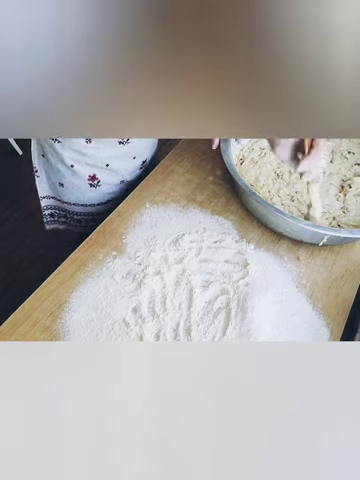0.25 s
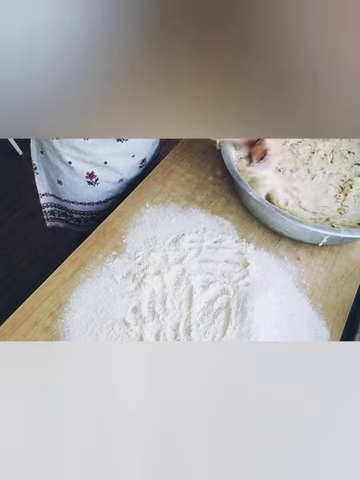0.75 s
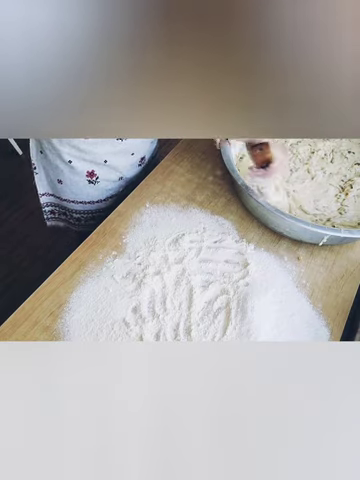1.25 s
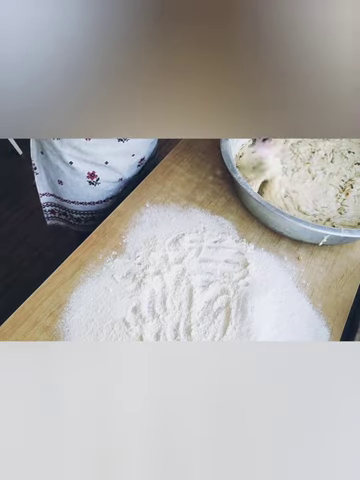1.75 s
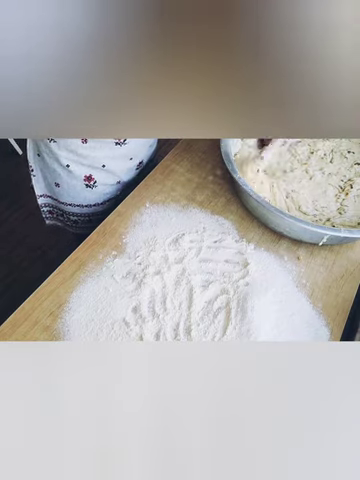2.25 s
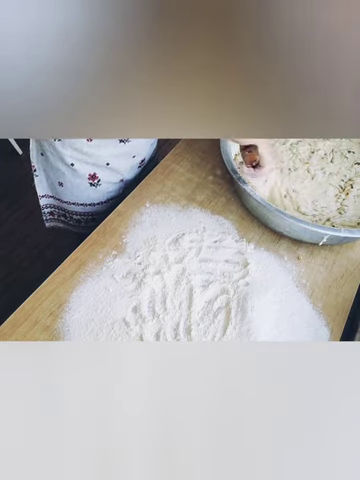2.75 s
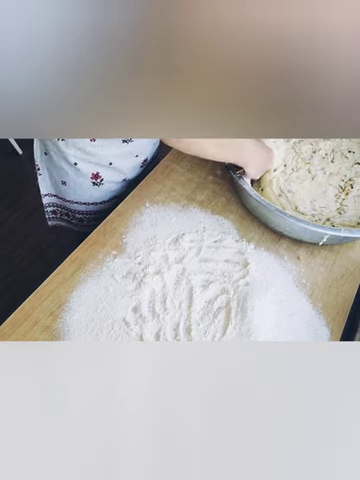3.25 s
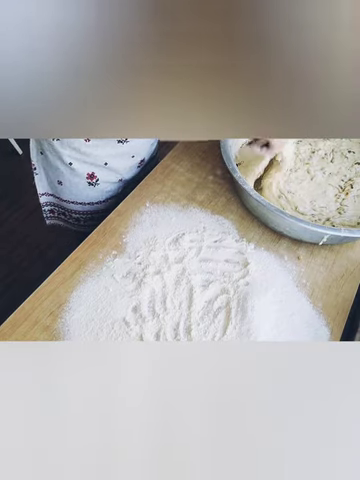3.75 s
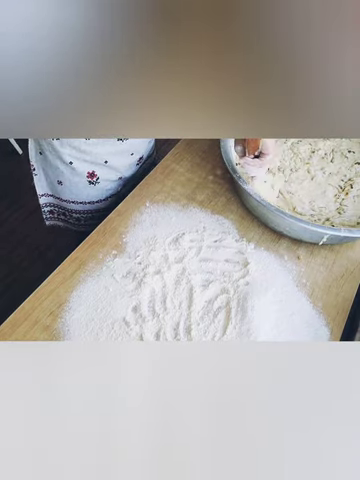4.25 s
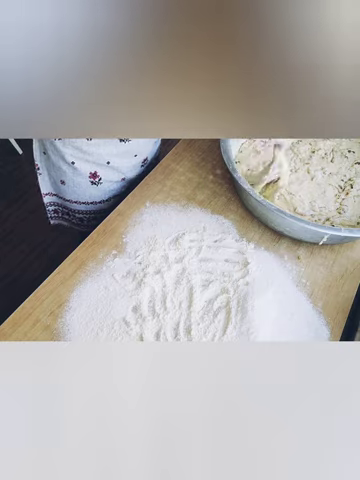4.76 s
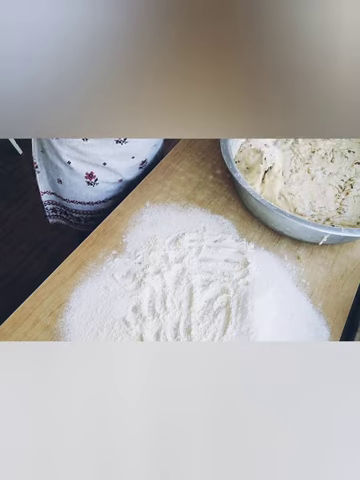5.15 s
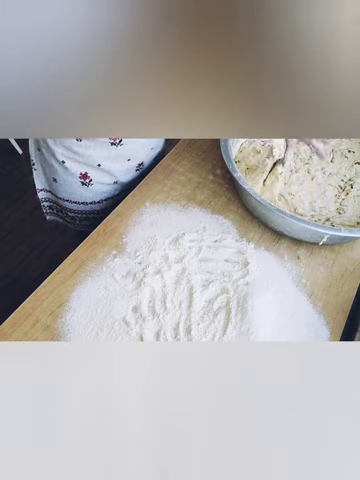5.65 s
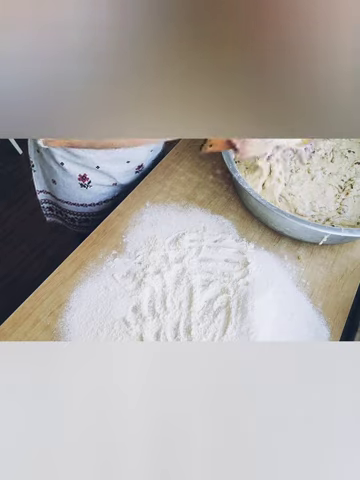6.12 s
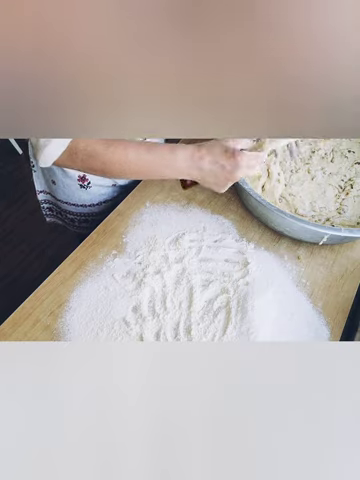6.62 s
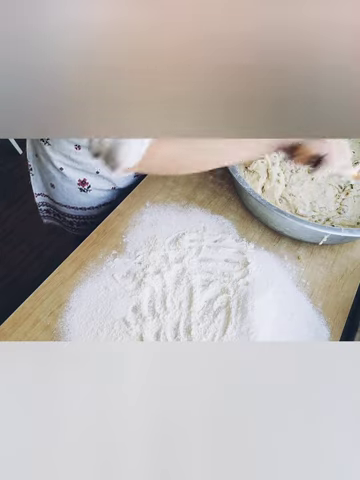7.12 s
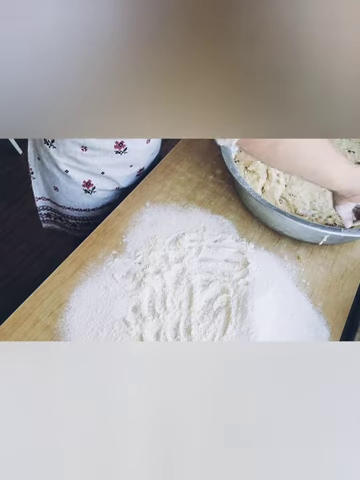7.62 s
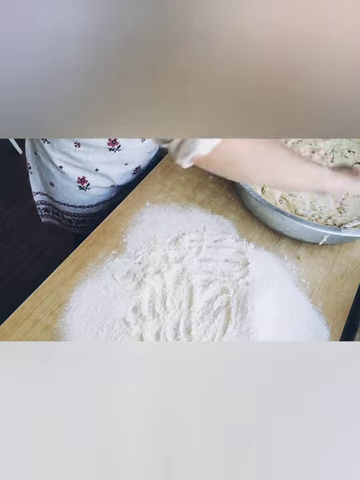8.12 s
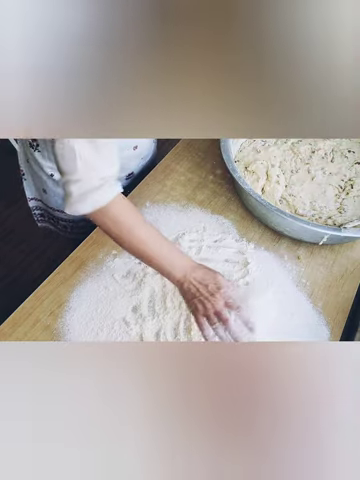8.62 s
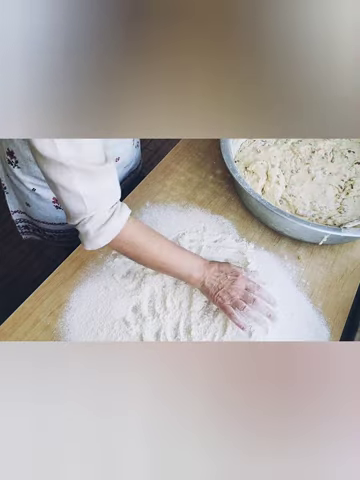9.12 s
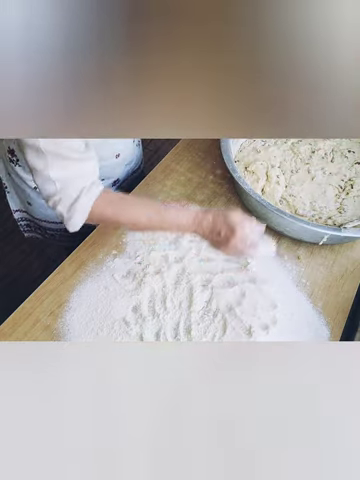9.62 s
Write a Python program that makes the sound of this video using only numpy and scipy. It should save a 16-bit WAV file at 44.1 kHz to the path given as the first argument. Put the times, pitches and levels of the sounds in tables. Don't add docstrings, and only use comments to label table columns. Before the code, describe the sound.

Close on a kitchen table, a wooden spoon drags through stiff dough in a metal bowl. The dough peels with grainy hisses and tiny bright snaps; the bowl thuds on the table, hardest around two and a half and four seconds. Later come soft floury hisses, then a clack with a ringing rim and a few hollow taps. A low fridge drone runs throughout in a small room, picked up by a phone close by.

```python
import sys
import numpy as np
from scipy import signal
from scipy.fft import rfft, irfft
from scipy.io import wavfile
from scipy.ndimage import uniform_filter1d, map_coordinates

SR = 44100
rng = np.random.default_rng(int(sys.argv[2]) if len(sys.argv) > 2 else 0)


def volts(x):
    e = np.asarray(x, float) / 20
    return 10 ** e


def store_wav(level_fs):
    pcm = np.round(np.clip(np.atleast_2d(level_fs), -1, 1) * 32767)
    wavfile.write(sys.argv[1], SR, pcm.T.astype(np.int16))


N = 435695
T = np.arange(N) / SR
HZ = np.maximum(np.arange(N // 2 + 1) * SR / N, 1)
ROOM_T60_S = 0.31


def unit(x):
    return x / np.sqrt(np.mean(x ** 2))


def along(table):
    hz, value = np.transpose(table)
    return np.interp(np.log(HZ), np.log(np.maximum(hz, 1)), value)


def colour(x, db):
    return irfft(rfft(x) * volts(db), N)


# (frequency [Hz], likeness [0..1]; values below 0 count as 0)
LIKENESS = [(60, 0.89), (130, 0.84), (290, 0.96), (640, 0.39), (1410, -0.11), (3100, 0.42), (6820, -0.91),
            (15000, 0.3)]


def pair(db):
    alike = np.clip(along(LIKENESS), 0, 1)
    mid, side = rfft(rng.standard_normal((2, N)))
    mid = mid * np.sqrt(1 + alike)
    side = side * np.sqrt(1 - alike)
    lead_s = .00013
    lead = np.exp(2j * np.pi * HZ * lead_s)
    return unit(irfft(np.array([(mid + side) * lead, mid - side]) * volts(db), N))


def walk(rate_hz):
    k = int(SR / rate_hz)
    wander = uniform_filter1d(rng.standard_normal(N), k)
    return unit(uniform_filter1d(wander, k))


def pan(db):
    return volts(np.array([[db / 2], [-db / 2]]))


def add(out, s, x):
    i = int(s * SR)
    out[:, i:i + x.shape[-1]] += x[..., :N - i]


def room(x, t60_s, build_s=0.00058):
    t = T[:SR // 2]
    tail = pair(0)[:, :len(t)] * 1000. ** (-t / t60_s) * (1 - np.exp(-t / build_s))
    return signal.fftconvolve(x, tail / np.sqrt(np.sum(tail ** 2) / 2), axes=1)[:, :N]


def ring(modes, t, chance):
    hz, db, t60_s = np.transpose(modes)[:, :, None]
    spread_db = 1.5
    level = volts(db + spread_db * chance[:, None])
    return np.sum(level * np.sin(2 * np.pi * hz * t) * 1000. ** (-t / t60_s), axis=0)


def resonances(table):
    return sum(volts(2 * db) / (1 + (2 * (HZ - hz) / width_hz) ** 2) for hz, width_hz, db in table)


def grains(rate_hz, spread_db, decay_s):
    size_db = spread_db * np.minimum(rng.exponential(size=N), 3.5)
    hits = (rng.random(N) < rate_hz / SR) * volts(size_db)
    pole = np.exp(-1 / (decay_s * SR))
    return unit(3.6 + signal.lfilter([1], [1, -pole], hits))


def patchy(x, patch_db, size=512):
    spec = signal.stft(x, nperseg=size)[2]
    field = uniform_filter1d(rng.standard_normal(spec.shape[1:]), size=3, axis=0)
    field = uniform_filter1d(field, size=12, axis=1)
    return signal.istft(spec * volts(patch_db * unit(field)), nperseg=size)[1][:, :N]


def contacts(rows, rise_db_s, sag_db_s, fall_db_s):
    s, hold_s, db = np.transpose(rows)[:3, :, None]
    t = T[::SR // 1000]
    late = t - s
    hold_s = np.maximum(hold_s, 0)
    shape_db = rise_db_s * np.minimum(late, 0)
    shape_db = shape_db - sag_db_s * np.clip(late, 0, hold_s)
    shape_db = shape_db - fall_db_s * np.maximum(late - hold_s, 0)
    return np.interp(T, t, np.sqrt(np.sum(volts(2 * (db + shape_db)), axis=0)))


def lower(rows):
    return [(s, hold_s, db + low_db) for s, hold_s, db, low_db in rows]


# (time [s], level [dB])
DRONE = [(0.0, -55), (0.58, -51.5), (0.88, -53), (1.62, -53.5), (1.79, -54), (2.12, -56), (2.72, -53.5),
         (2.94, -53.5), (4.13, -52), (4.68, -52.5), (7.7, -54.5), (8.34, -61), (8.72, -53.5), (9.08, -54),
         (9.44, -53), (9.88, -53)]
# (frequency [Hz], density [dB per Hz])
AIR = [(28, -17), (60, -28), (85, -17), (130, -18), (190, -17), (260, -13.5), (340, -9), (450, -13),
       (560, -17), (660, -14), (730, -22.5), (820, -30), (1000, -49), (1400, -40.5)]
# (frequency [Hz], width [Hz], level [dB])
BOOMS = [(102, 6.6, 13), (110.6, 9.8, 14.5), (142, 8, -6), (176, 6.3, 2), (205.1, 5.1, 8.5), (243, 9.5, 9),
         (266, 5.5, 1.5), (291.9, 5.3, 16), (330, 7.3, 4.5), (365, 9, 12.5), (394.5, 8, 2),
         (425, 1.2, 15.5), (458.4, 4.6, 12), (487, 1.3, 5.5), (519, 6, 9.5), (579.4, 13, 6.5),
         (650, 7.4, 5), (603, 30, 2.5), (757, 30, 2), (862, 25, 8)]
# (frequency [Hz], density [dB per Hz])
HUSH = [(530, -23), (900, 2), (1130, -6), (1580, -12), (1910, -9.5), (2460, -10), (2640, -14), (4310, -22),
        (4690, -18), (7210, -20), (8330, -17), (15100, -16.5), (15700, -24)]
# (frequency [Hz], left minus right [dB])
LEAN = [(60, 1.5), (110, -2.5), (200, -0.5), (380, -3.5), (700, 0), (1290, -1), (2380, -2), (4400, 3),
        (8120, -6.5), (15000, 0)]
# (frequency [Hz], width [Hz], level [dB])
WHINES = [(4830, 20, -96), (14750, 200, -97)]
# (time [s], hold [s], level [dB])
WHINE_SWELLS = [
    (5.08, .05, 5),
    (5.85, .15, 3),
    (6.21, .1, 11),
    (6.42, .14, 5),
    (8.75, 0.11, 8),
]
# (time [s], hold [s], level [dB])
FAN_SQUEAKS = [(4.916, .01, -91), (5.4, .03, -91), (5.6, 0.17, -94), (6.222, .01, -91), (6.7, 0.018, -85),
               (7.062, .01, -84), (7.97, .01, -84), (8.838, .01, -89), (9.244, .01, -85), (9.646, .01, -91),
               (9.87, .01, -96)]
# (multiple of motor pitch [-], level [dB])
MOTOR_ORDERS = [(2, -68), (5, -70), (6, -65), (12, -72)]


def fridge():
    motor_hz, motor_db, motor_pan_db = 49.3, -56.5, -6.5
    squeak_rule = 98, 0, 155
    drone_db = np.interp(T, *np.transpose(DRONE))
    lean_db = along(LEAN) * np.array([[.5], [-.5]])

    rumble = pair(along(AIR) + 10 * np.log10(1 + resonances(BOOMS)) + lean_db - HZ / 300)
    rumble = patchy(rumble, patch_db=1.65, size=1024)
    rumble = rumble * volts(drone_db + 0.39 * walk(6.3) + 3.0)
    hush = pair(along(HUSH) + lean_db) * volts(-77.0 + 2.0 * walk(1.0))

    whine = np.zeros((2, N))
    for hz, width_hz, db in WHINES:
        peaks = resonances([(hz, width_hz, 0), (.949 * hz, width_hz, -10)])
        whine += pair(20 * np.log10(peaks)) * volts(db + 1.5 * walk(3))
    whine = whine * np.hypot(1, contacts(WHINE_SWELLS, *squeak_rule))
    squeak = pair(20 * np.log10(resonances([(1890, 97, 0)])))
    squeak = squeak * volts(3.0) * contacts(FAN_SQUEAKS, *squeak_rule)

    phase = 2 * np.pi * np.cumsum(motor_hz + 1.0 * walk(2.8)) / SR
    motor = volts(motor_db + 3.5 + 1.1 * walk(9)) * np.sin(phase) * pan(motor_pan_db)
    turn = 2 * np.pi * np.cumsum(motor_hz + .25 * walk(3)) / SR
    overtones = sum(volts(db + 1.3 * walk(11.0)) * np.sin(k * turn) for k, db in MOTOR_ORDERS)
    overtones = overtones * pan(1.0) * volts(drone_db + 54.0)
    return rumble + hush + whine + squeak + motor + overtones


# (time [s], hold [s], level [dB])
FINGERS = [
    (5.98, .03, -73),
    (6.72, .06, -88),
    (7.045, .02, -77),
    (7.13, .03, -68),
    (7.22, .08, -80),
]


def fingers():
    hz, width_hz = 10400, 2500
    hiss = patchy(pair(20 * np.log10(resonances([(hz, width_hz, 0)]))), patch_db=4.0)
    return hiss * contacts(FINGERS, 400.0, 30.0, 300.0) * pan(4.0)


# (time [s], low clack [dB], high clack [dB
# rel.], low pitch [Hz], high pitch [Hz])
TAPS = [(1.103, -44.5, -12, 1360, 2030), (1.115, -55, -20, 1340, 2050), (1.145, -51, -30, 1950, 2700),
        (1.182, -60, -1, 2920, 4400), (1.198, -63, -5, 2800, 4400), (1.065, -63, -3, 4500, 5200),
        (7.064, -90, 19, 2000, 4440), (1.423, -36, -9, 2100, 3300), (7.552, -38, -10, 806, 3050),
        (7.554, -60, 7, 1000, 4480), (8.036, -48, -5.5, 1250, 2320), (8.05, -55, -8, 1250, 2500),
        (8.075, -57, -3, 1250, 2380), (8.061, -56, -5.5, 1240, 2480), (8.09, -53, -11, 1230, 2450),
        (8.125, -62, -13, 1250, 2450), (8.155, -52.5, -32, 1100, 2400), (8.19, -68, -30, 1120, 2400),
        (8.351, -59, -2, 1110, 2680), (8.363, -55, 3, 1280, 2450), (8.39, -57, -5, 900, 2380),
        (8.43, -66, -7, 1200, 2450), (8.377, -53.5, -2, 1010, 2290), (8.404, -56, -13, 955, 2450),
        (8.038, -47.5, -33, 685, 2600), (8.353, -44.5, -30, 650, 2780)]
# (time [s], level [dB])
RIM_STRIKES = [
    (7.552, -48.5),
    (8.043, -76),
]
# (frequency [Hz], level [dB], t60 [s])
RIM = [(705, 0, .2), (1001, -2, .2), (1297, 6, .9), (2480, -14, .2), (2772, 0, .16), (2902, -4, .18),
       (3106, -7, .2), (3429, 3, .26), (3806, -10, .2), (4436, -4, .26), (5023, -6, .25)]


def taps():
    rim_free_s, hollow_from_s = 0.11, 8
    clacks, rings, t = np.zeros((2, N)), np.zeros((2, N)), T[:SR // 2]
    for s, db, high_db, low_hz, high_hz in TAPS:
        span_s = .00095 if s > hollow_from_s else .00075
        damp = t / span_s * np.exp(1 - t / span_s)
        body = np.sin(2 * np.pi * low_hz * t)
        body = body + volts(high_db + 4.0) * np.sin(2 * np.pi * high_hz * t)
        add(clacks, s, volts(db - 7.5) * damp * body[None])
    held = volts(-170 * np.maximum(t - rim_free_s, 0))
    for s, db in RIM_STRIKES:
        add(rings, s, volts(db - 13.5) * held * ring(RIM, t, np.zeros(len(RIM))) * pan(10.0))
    return volts(-13.0) * clacks + rings + volts(11.5) * room(clacks, 0.78 * ROOM_T60_S, build_s=.008)


# (time [s], blow [dB], table sway [dB rel.], rattle [dB rel.], blow pitch [Hz])
THUMPS = [(.443, -38, -10, -31, 373), (0.51, -36, -13, -36, 305), (.626, -42, -26, -19, 430),
          (1.007, -40, 1, -41, 302), (1.386, -28.5, -6.5, -33, 297), (1.4193, -22.5, -10.5, -25.5, 330),
          (1.500, -36.5, 1, -24, 268), (1.545, -41, -5, -22, 306), (2.197, -42, -17, -42, 270),
          (2.524, -8.5, -14.5, -30.5, 422), (4.002, -8, -15.5, -27.5, 417), (7.549, -35, -37, -19, 554),
          (8.04, -52.5, 7.5, -13, 497), (8.353, -50.5, -3, -13.5, 567), (7.562, -38, -27, -22, 396),
          (7.567, -49, -30, -30, 330), (7.595, -41.5, -30, -30, 342), (.648, -47, -28, -35, 400),
          (0.633, -38.5, -26, -20.5, 347), (0.654, -48, -28, -23, 418)]
# (time [s], level [dB], pitch [Hz])
BOUNCES = [(4.0067, -15.5, 350), (4.127, -31.5, 294), (4.193, -35, 368), (2.541, -21, 330),
           (2.5525, -24, 294), (2.615, -32, 300), (4.323, -39.5, 330), (4.39, -40.5, 345), (5.1, -42, 405),
           (5.426, -37.5, 396), (6.155, -38, 352)]
# (frequency [Hz], level [dB], t60 [s])
TABLE = [(65.3, -3.5, 0.76), (90, 4, 0.24), (152.6, 1, 0.33), (268, 3, 0.38), (336.6, 5.5, 0.26),
         (380, -12.5, 0.43), (428, -3, 0.11), (454, -31, .4), (561.4, 6.5, 0.17), (573, -35, 0.38),
         (652, 1, 0.28), (757, -2.5, 0.37), (847, -1.5, 0.16), (926, -16.5, 0.47), (986, -13, 0.25),
         (1140, -15, 0.21), (1283, -25, 0.39), (1400, -21, 0.33)]


def thumps():
    port_lag_s, rattle_lag_s, sway_lag_s, sway_t60_s = .0002, 0.00043, 0.0028, 0.068
    blows, rattles, out = np.zeros((3, 2, N))
    t = np.maximum(T[:SR // 2] - np.array([[0], [port_lag_s]]), 0)
    late = T[:80] - np.array([[rattle_lag_s], [0]])
    jolt = (late >= 0) * np.exp(-np.abs(late) / 0.00059)
    chance = rng.standard_normal((len(THUMPS), len(TABLE)))
    for (s, db, sway_db, rattle_db, hz), c in zip(THUMPS, chance):
        cycles = hz * t - 1.55
        blow = np.sin(2 * np.pi * cycles) * np.exp(-(cycles / 0.6) ** 2)
        add(blows, s, volts(db + 4.0) * blow * pan(-0.58))
        add(rattles, s + 0.002177, volts(db + rattle_db + 16.0) * jolt)
        top = ring(TABLE, t[0], c) * (1 - np.exp(-(t[0] / 0.0015) ** 2))
        add(out, s, volts(db - 26.0) * top * pan(-3.0))
        turn = 72 * t[0] + 1.11 * (1 - np.exp(-t[0] / 0.0094))
        swell = 1 - np.exp(-(t[0] / 0.015) ** 2)
        sway = np.sin(2 * np.pi * turn) * swell * 1000. ** (-t[0] / sway_t60_s)
        add(out, s + sway_lag_s, volts(db + sway_db + 18.5) * sway)
    for s, db, hz in BOUNCES:
        cycles = hz * t - 1.55
        bounce = np.sin(2 * np.pi * cycles) * np.exp(-(cycles / 1.0) ** 2)
        add(out, s, volts(db) * bounce * pan(-1.5))
    band = signal.butter(2, [600, 2050], "band", fs=SR, output="sos")
    rattles = signal.sosfilt(band, rattles)
    echoes = volts(-4.5) * room(blows, 1.27 * ROOM_T60_S)
    echoes = echoes + volts(13.0) * room(rattles, 1.28 * ROOM_T60_S)
    return blows + out + volts(2.5) * rattles + echoes


# (time [s], hold [s], level [dB], dull rub [dB rel.])
SCRAPES = [(.04, 0.45, -73, -13), (2.33, 0.06, -65, -25), (2.44, 0.031, -65, -27),
           (2.61, 0.033, -52.5, 0.5), (2.72, 0.069, -62.5, -3), (2.83, 0.04, -67, 1),
           (2.9, 0.066, -63.5, -17), (3.04, .08, -78.5, 0), (3.24, .01, -81, 5), (4.475, 0.041, -63.5, -14),
           (4.515, 0.0089, -63, -6), (6.03, 0.028, -78.5, -11)]
# (frequency [Hz], width [Hz], level [dB])
WALL = [(1750, 600, -15), (1087, 30, -18), (1283, 30, -1), (1410, 25, -5), (1455, 28, 3), (1600, 40, -8),
        (1740, 36, 6), (1850, 40, -9), (1957, 30, -2), (2093, 35, -5)]
# (time [s], hold [s], level [dB], dull rub [dB rel.])
SMEARS = [(0.245, 0.019, -70.5, -8), (4.38, 0.012, -71.5, 15), (8.048, .03, -91, -5),
          (0.444, .03, -75.5, -6), (0.502, 0.045, -65.5, -13), (0.595, .02, -63.5, 2.5),
          (0.622, 0.02, -55.5, -7), (1.07, .02, -68.5, -6), (1.11, .005, -70, 6), (1.16, 0.03, -68, 9.5),
          (1.202, 0.018, -73, -9), (1.478, 0.027, -56.5, 0.5), (4.04, 0.091, -74, -10)]
# (frequency [Hz], width [Hz], level [dB])
DAMPED_WALL = [(1170, 300, -18), (1430, 380, 1), (1950, 450, -1), (2450, 450, -5.5)]


def spoon():
    swell_db, wall_drift = 2.5, 0.0123
    rule = 266.5, 31, 236
    noise = rfft(pair(0))
    sing = np.zeros((2, N))
    for mode in WALL:
        tone = irfft(noise * resonances([mode]) / volts(mode[2]), N)
        sing += tone * volts(swell_db * walk(22))
    place = np.arange(N) + np.cumsum(wall_drift * walk(12.6))
    sing = np.array([map_coordinates(side, [place], order=3, mode="mirror") for side in sing])
    scrape = contacts(SCRAPES, *rule) * unit(sing)

    smear = patchy(pair(20 * np.log10(resonances(DAMPED_WALL))), patch_db=3.5, size=256)
    smear = smear * contacts(SMEARS, *rule)

    rub = pair(-14 * np.abs(np.log2(HZ / 800)) - HZ / 250)
    grit = grains(rate_hz=490, spread_db=8.0, decay_s=0.0041)
    rub = contacts(lower(SCRAPES + SMEARS), *rule) * grit * rub
    return volts(2.0) * (scrape + smear + rub)


# (frequency [Hz], density [dB per Hz])
HISS_COLOUR = [(1350, -24), (2300, -7.5), (2620, -9), (2790, -5.5), (3440, -6.5), (4860, -4), (6240, -5.5),
               (7880, -3), (8680, -4.5), (11500, -3.5), (15100, -5.5), (15800, -6.5)]


def split():
    upper = 1 / (1 + (5600 / HZ) ** 5)
    lean_db = 2.9 * np.log2(HZ / 3500) * np.array([[.5], [-.5]])
    db = along(HISS_COLOUR)
    return db + lean_db + 20 * np.log10(upper + .001), db + 20 * np.log10(1.001 - upper)


# (time [s], peak [dB], left minus right [dB], lower part [dB rel.])
TICKS = [(0.4375, -31.5, 14, -27), (0.4455, -22, -2, -25.5), (0.7302, -57, 5, -23), (1.0121, -49, 6, -20),
         (1.0573, -30.5, 5, -20), (1.182, -52.5, 5, 6.5), (1.3887, -48, -1, -24), (1.4235, -19.5, 4, -10.5),
         (1.688, -50, 6, -22), (1.937, -52, 4, -8), (2.0175, -48, 2, -31), (2.094, -51, 9, -39),
         (2.301, -57.5, 2, -7), (2.5266, -40, 4, -28), (2.537, -29.5, -1, -26), (2.613, -55, 8, 6.5),
         (3.3576, -56, 15, -37), (3.654, -52.5, 10, -36), (4.011, -33, -1, -14), (4.1288, -43, 9, -3),
         (4.183, -40, 2, -26), (5.886, -52, 1, -10), (5.977, -55, 11, -17), (6.4, -64, -4, -15),
         (7.038, -56, 9, -18), (7.1062, -67, 9, -18), (7.431, -38, 8, -20), (7.5482, -40, 6, -8),
         (8.0414, -62, -3, -13), (8.361, -55.5, -8, -7), (.412, -55, 6, -24), (1.063, -35, -12, -27),
         (1.394, -42, 10, -27), (2.78, -50, 3, -26), (2.8195, -46, 9, -28), (.5, -51, 18, -22),
         (7.511, -47, 0, -6), (1.45, -43, -3, -15)]


def ticks():
    high, low, t = np.zeros((2, N)), np.zeros((2, N)), T[:SR // 100]
    chance = rng.standard_normal((len(TICKS), 2, len(t)))
    for (s, db, pan_db, low_db), noise in zip(TICKS, chance):
        snap = noise * np.exp(-t / 0.00053) * volts(db + 0.5) * pan(pan_db)
        add(high, s, snap)
        add(low, s, snap * volts(low_db + 11.5))
    high_db, low_db = split()
    top_cut_db = 4 / (1 + (12500 / HZ) ** 8)
    snaps = colour(high, high_db - top_cut_db) + colour(low, low_db)
    return volts(2.0) * snaps + volts(4.5) * room(snaps, 0.58 * ROOM_T60_S)


def effort(peels, rubs, rest_db):
    peel_rise_db_s, rub_rise_db_s, sag_db_s = 779, 177, 28
    power = volts(2 * rest_db)
    for rows, rise_db_s in ((peels, peel_rise_db_s), (rubs, rub_rise_db_s)):
        for fall_db_s, db in ((174, 0), (39, -33)):
            power = power + (contacts(rows, rise_db_s, sag_db_s, fall_db_s) * volts(db)) ** 2
    return np.sqrt(power)


# (time [s], hold [s], hiss [dB], lower hiss [dB rel.])
PEELS = [(.04, 0.44, -71, -10), (.41, 0.018, -63.5, -9), (.465, .005, -63, 4.5), (.51, 0.14, -62, -6),
         (.74, 0.022, -72, -19), (1.02, 0.047, -58.5, -13), (1.08, .005, -69, 7.5), (1.13, 0.11, -68, -2.5),
         (1.396, 0.022, -58.5, -7), (1.44, 0.11, -61.5, 2.5), (1.69, 0.14, -68.5, -9),
         (2.1, 0.071, -70, -11), (2.31, 0.15, -68, -2), (2.54, 0.03, -55.5, -3), (2.6, 0.33, -63.5, 1.5),
         (3.37, 0.16, -77, -7), (3.68, 0.16, -75.5, -11), (4.015, 0.024, -60.5, -7), (4.07, 0.18, -65, -1),
         (5.89, 0.028, -73, -11), (7.2, 0.19, -67.5, -13), (7.445, 0.04, -52.5, -10.5),
         (7.56, 0.094, -56.5, -6), (8.05, .03, -85, 7), (8.37, 0.035, -77, -0.5)]
# (time [s], hold [s], hiss [dB], lower hiss [dB rel.])
RUBS = [(1.96, .005, -63, -12.5), (2.951, 0.17, -61, -8), (3.246, .01, -74, -23), (4.35, 0.084, -68, -1),
        (4.51, 0.11, -68.5, -6), (4.906, .02, -79, -4.5), (6.004, .01, -72, -7),
        (6.243, 0.018, -72.5, -8.5), (6.41, .02, -74.5, -8.5), (6.74, 0.16, -79, -9),
        (7.056, 0.017, -75, -6), (7.144, .01, -65.5, -14), (6.576, 0.12, -85, -7), (6.95, .05, -93, -6)]


def dough():
    rest_db, rest_low_db = -89, -5
    high_db, low_db = split()
    grain = grains(rate_hz=150, spread_db=3.5, decay_s=0.002)
    high = pair(high_db) * volts(0.55 * walk(25)) * effort(PEELS, RUBS, rest_db)
    low = pair(low_db) * volts(2.25 * walk(15.5))
    low = low * effort(lower(PEELS), lower(RUBS), rest_db + rest_low_db)
    return patchy(high + low, patch_db=2.5) * grain * volts(2.0)


def scene():
    return fridge() + fingers() + taps() + thumps() + spoon() + ticks() + dough()


def low_pass(x):
    return signal.sosfilt(signal.butter(12, 16520, fs=SR, output="sos"), x)


def record(dry):
    top = signal.ellip(8, .2, 40, 15740, fs=SR, output="sos")
    bass = signal.butter(2, 35, "high", fs=SR, output="sos")
    heard = colour(dry, -5 / (1 + ((HZ - 2350) / 150) ** 2))
    mix = signal.sosfilt(np.vstack([top, bass]), heard)
    return low_pass(mix)


dry = scene()
out = record(dry)
store_wav(out)
```